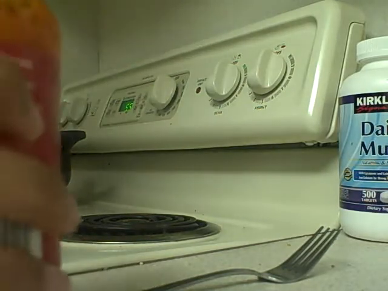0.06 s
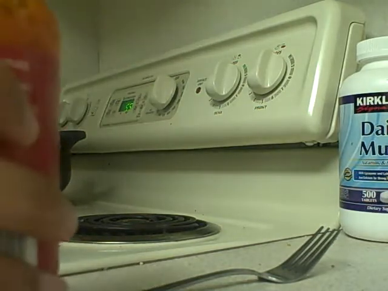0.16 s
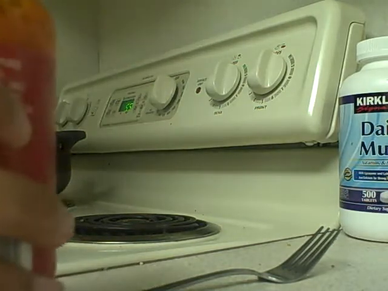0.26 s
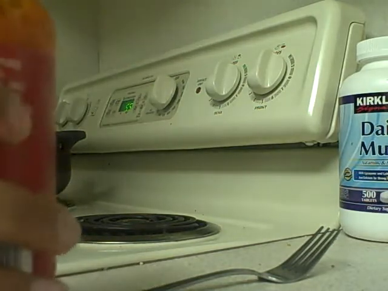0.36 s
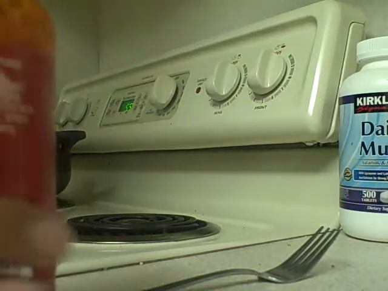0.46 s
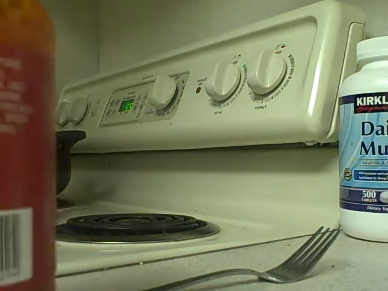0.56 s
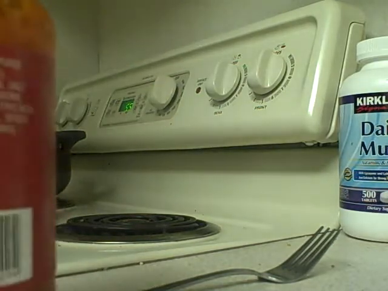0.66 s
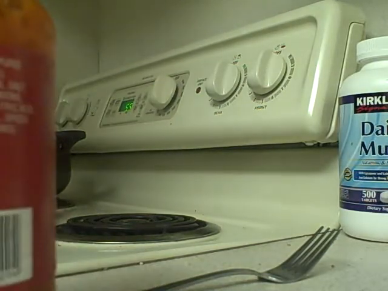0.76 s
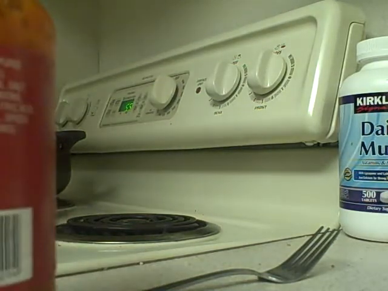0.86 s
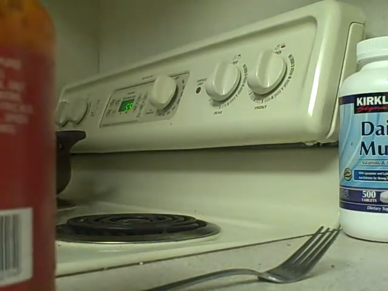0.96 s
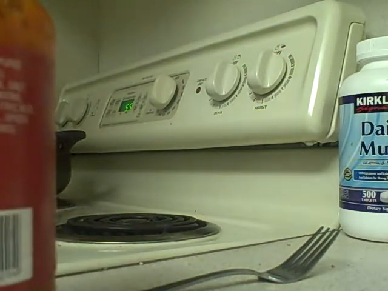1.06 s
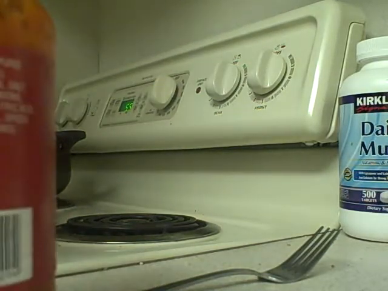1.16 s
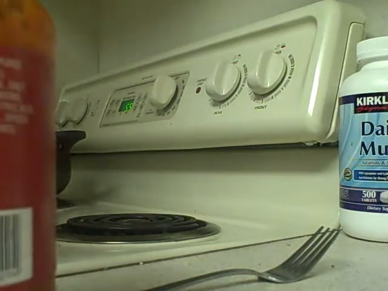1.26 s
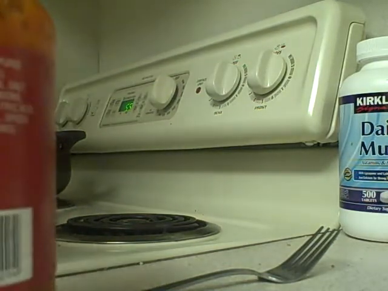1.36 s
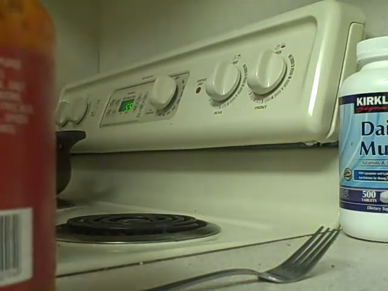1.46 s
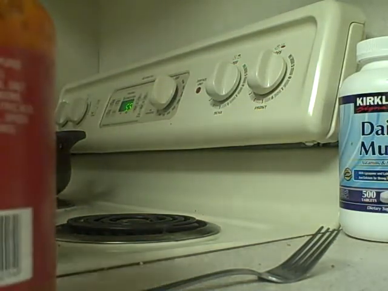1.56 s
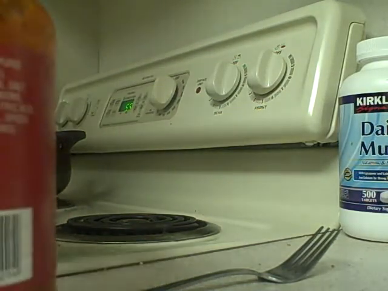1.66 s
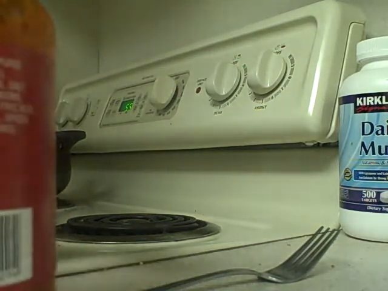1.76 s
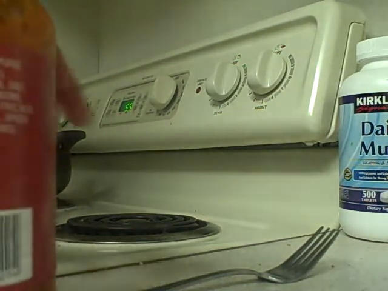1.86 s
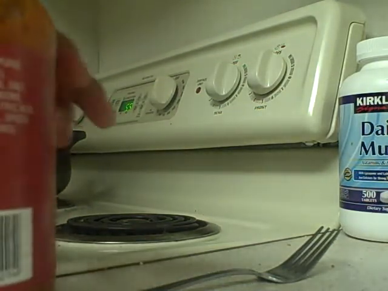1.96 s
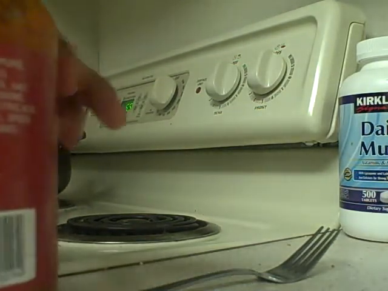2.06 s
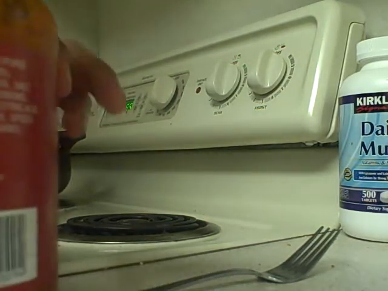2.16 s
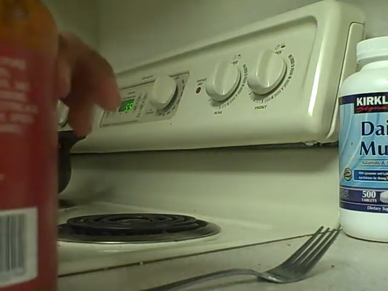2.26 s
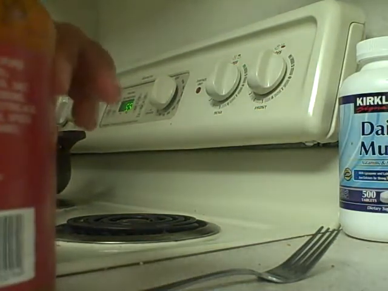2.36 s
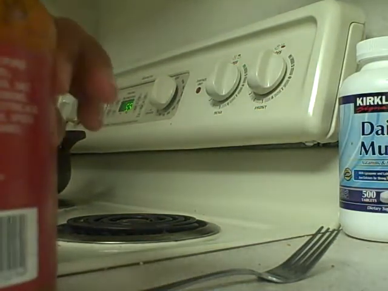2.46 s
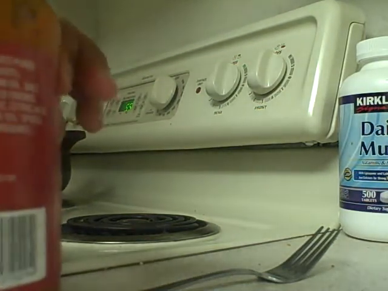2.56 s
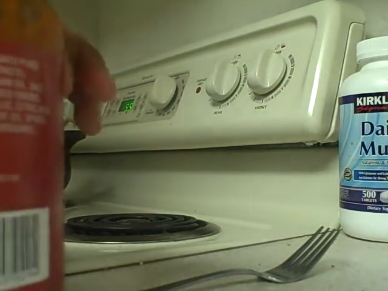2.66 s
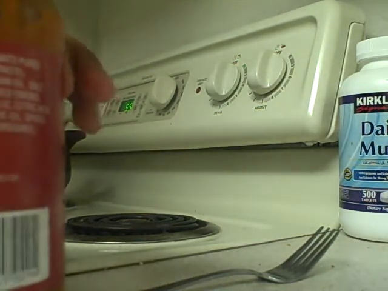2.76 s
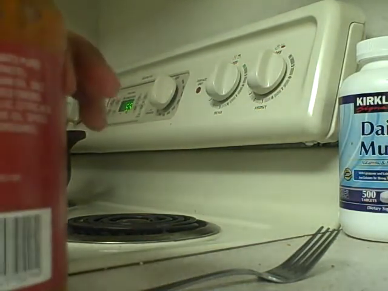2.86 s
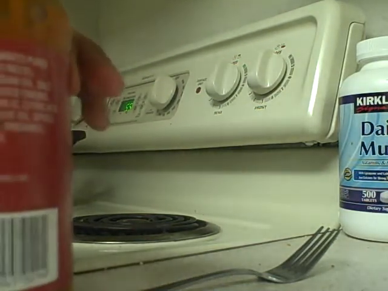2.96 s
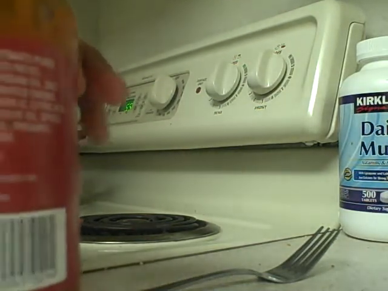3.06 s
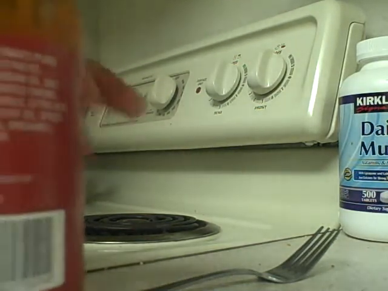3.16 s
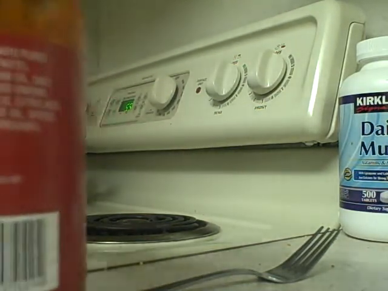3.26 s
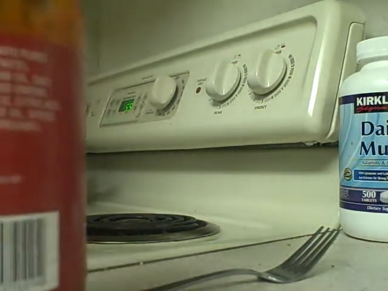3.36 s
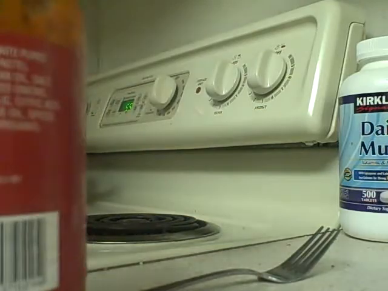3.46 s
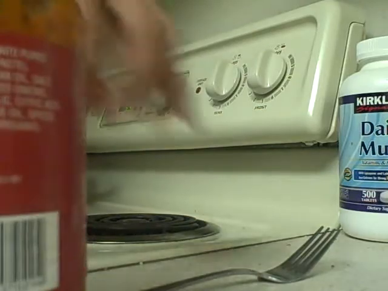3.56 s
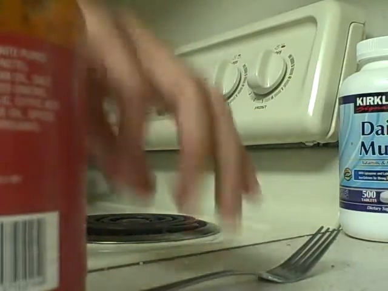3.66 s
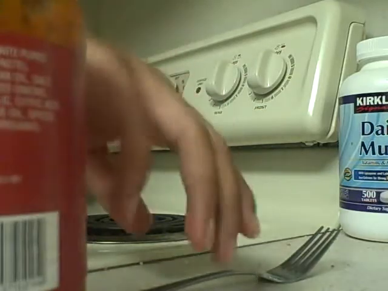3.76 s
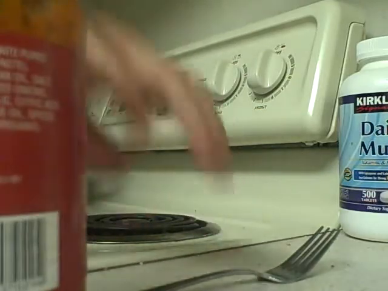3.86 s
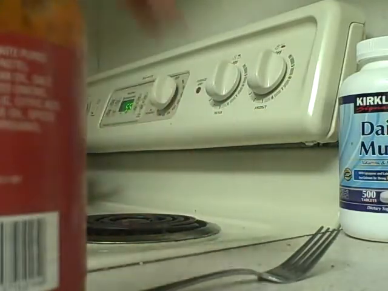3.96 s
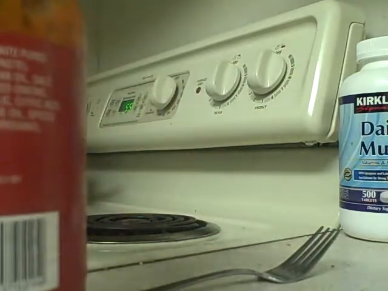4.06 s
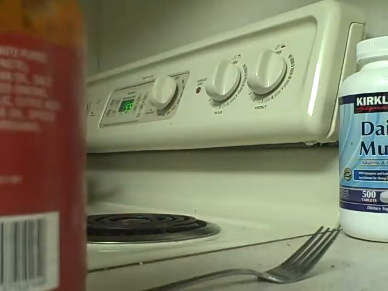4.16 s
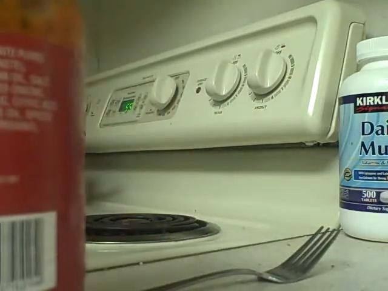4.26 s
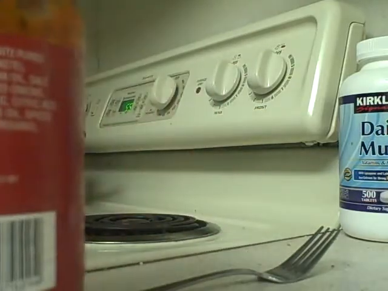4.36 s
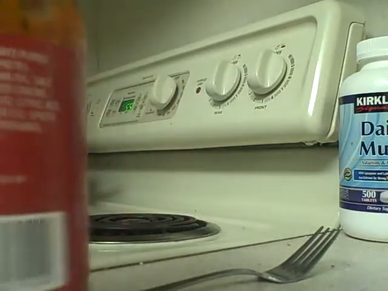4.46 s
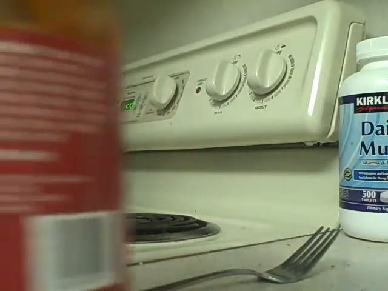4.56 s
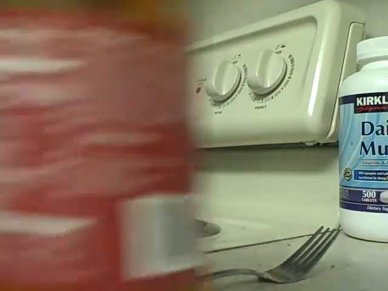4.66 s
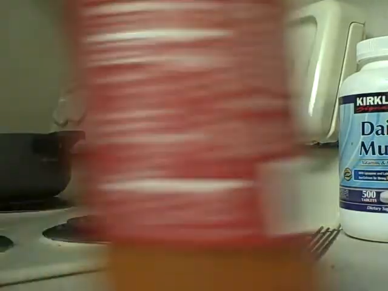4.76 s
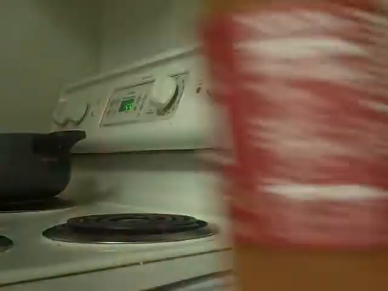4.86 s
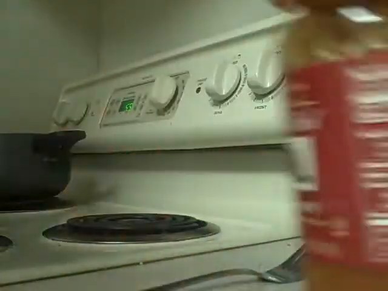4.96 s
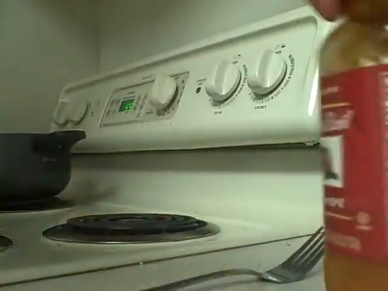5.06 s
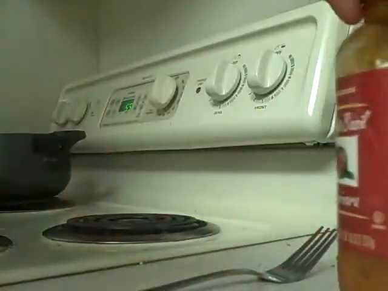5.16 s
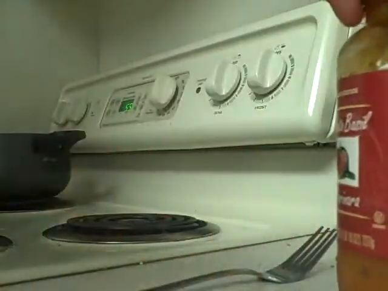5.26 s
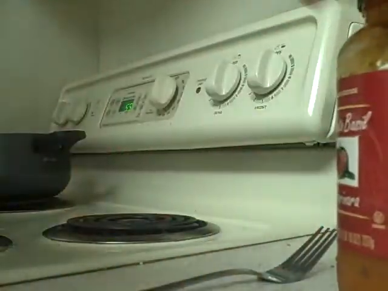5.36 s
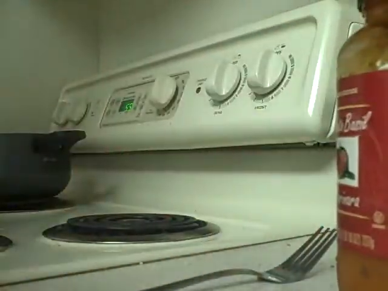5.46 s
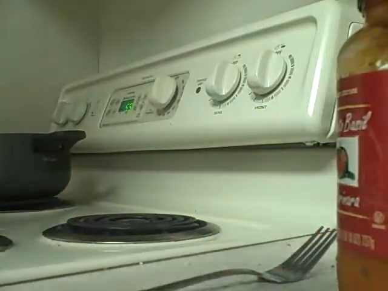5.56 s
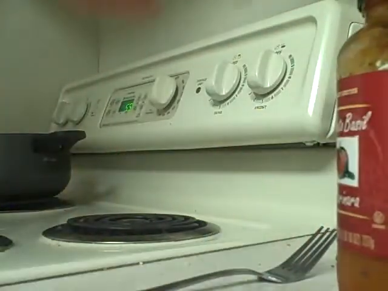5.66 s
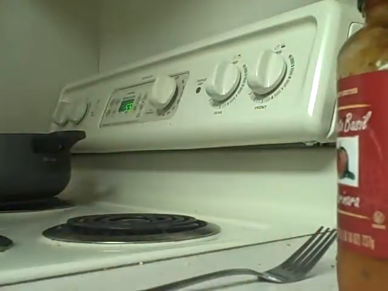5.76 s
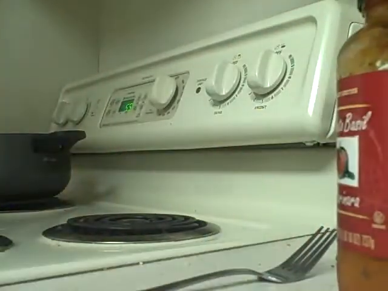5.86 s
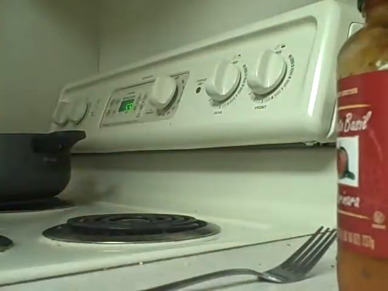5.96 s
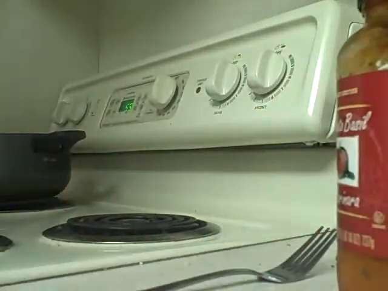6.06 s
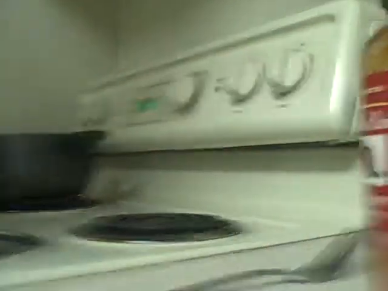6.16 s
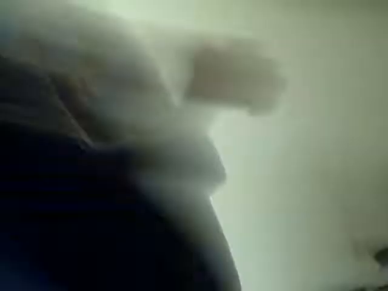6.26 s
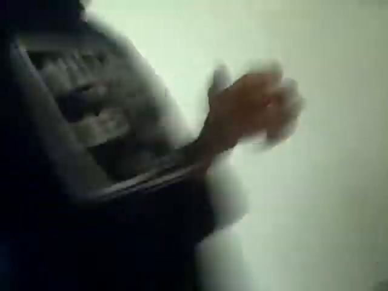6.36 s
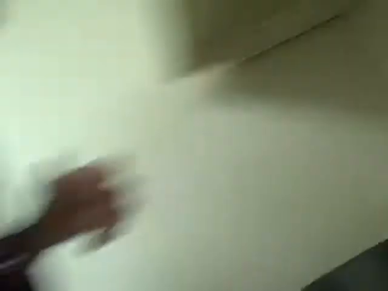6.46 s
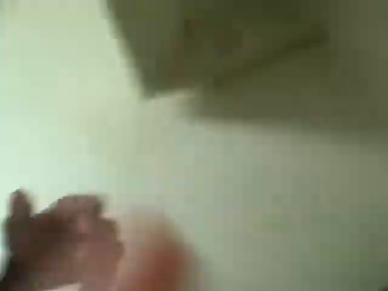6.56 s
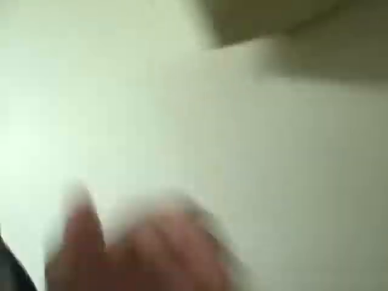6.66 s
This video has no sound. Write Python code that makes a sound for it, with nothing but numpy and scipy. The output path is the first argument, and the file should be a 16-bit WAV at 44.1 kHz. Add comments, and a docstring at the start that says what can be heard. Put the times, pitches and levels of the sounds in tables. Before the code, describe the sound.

A full glass jar knocks and slides on a kitchen counter, a pot clinks, then a hard bang, rattle and handling noise.

```python
"""A full glass sauce jar is set down and nudged on a kitchen counter: knocks with a boom, thud and rebound.
Then it is handled again, knocking, sliding and pinging, while a cooking pot on the stove is clinked.
Near the end it is banged down hard, the stove's sheet metal buzzes, and the jar rocks to rest.
Last, a hand rubs and picks up the camera, which stands on the same counter. A small kitchen answers the
blows, metal, glass and clicks, over steady background noise and a hum that swells now and then."""
import sys
import numpy as np
from scipy import signal
from scipy.fft import rfft, irfft, next_fast_len
from scipy.io import wavfile
from scipy.ndimage import map_coordinates

SR = 44100
rng = np.random.default_rng(int(sys.argv[2]) if len(sys.argv) > 2 else 0)


def unload_audio(sound):
    """Save the sound as a 16-bit wav file, at the path given as the first command line argument."""
    columns = np.transpose(np.atleast_2d(sound))
    # keep every value between -1 and 1, then stretch to whole-number steps
    steps = np.round(np.clip(columns, -1, 1) * 32767)
    wavfile.write(sys.argv[1], SR, steps.astype(np.int16))


N = 295161
T = np.arange(SR) / SR  # seconds since a blow


def amp(db):
    """Decibels to gain."""
    return 10 ** (np.asarray(db) / 20)


def unit(x):
    """Scale to rms 1."""
    return x / np.sqrt(np.mean(x ** 2) + 1e-20)


def along(points, hz):
    """Read (f/Hz, value) points on a log frequency axis."""
    f, value = np.transpose(points)
    return np.interp(np.log(hz + 1), np.log(f + 1), value)


def wobble(rate):
    """A smooth random curve with rate knots a second."""
    knots = rng.standard_normal(int(N * rate / SR) + 4)
    return map_coordinates(knots, [np.arange(N) * rate / SR])


def filtered(x, response):
    """Shape x by a response of frequency."""
    size = next_fast_len(len(x) + SR // 4)
    spectrum = rfft(x, size) * response(np.fft.rfftfreq(size, 1 / SR))
    return irfft(spectrum, size)[:len(x)]


def coloured(x, spectrum):
    """Equalise x with a (f/Hz, level/dB) curve, at rms 1."""
    return unit(filtered(x, lambda hz: amp(along(spectrum, hz))))


def soften(x, hz, order):
    """A causal low-pass: a longer contact holds less treble."""
    low_pass = signal.butter(order, min(hz, SR / 2 - 1), fs=SR, output="sos")
    return signal.sosfilt(low_pass, x)


def add(track, s, sound):
    """Mix a sound into the track at s seconds."""
    part = track[max(round(s * SR), 0):][:len(sound)]
    part += sound[:len(part)]


def swells(rows, rise_s, fall_s):
    """Fade in, hold and die away for each (t, length, dB, ..) row: one gain curve for each dB column."""
    t = np.arange(N) / SR
    gains = np.zeros((len(rows[0]) - 2, N))
    for s, length, *db in rows:
        fade_in = np.clip((t - s) / rise_s, 0, 1)
        fade_out = amp(-20 * np.maximum(t - s - length, 0) / fall_s)  # loses 20 dB in fall_s
        gains = np.maximum(gains, amp(db)[:, None] * fade_in * fade_out)
    return gains


def ring(modes, scatter_db):
    """Damped modes, with new random strengths at every call; neighbours swing in opposite directions."""
    hz, db, t60 = np.transpose(modes)[:, :, None]
    t = T[:SR // 2]
    level = db + scatter_db * rng.standard_normal(db.shape)
    sign = np.cos(np.pi * np.arange(len(hz)))[:, None]
    partials = sign * amp(level - 60 * t / t60) * np.sin(2 * np.pi * hz * t)
    return np.pad(partials.sum(0), (0, SR - len(t)))


def dying_noise(spectrum, decay):
    """Countless modes as noise, each band fading at its own speed; energy 1."""
    hz, t, bands = signal.stft(rng.standard_normal(SR), SR, nperseg=256)
    bands = bands * amp(-60 * t / along(decay, hz)[:, None])
    fading = signal.istft(bands, SR, nperseg=256)[1][:SR]
    return coloured(fading, spectrum) / np.sqrt(SR)


def crack(t60):
    """The burst of noise at a hard contact, fading 60 dB in t60 seconds."""
    return rng.standard_normal(SR) * amp(-60 * T / t60)


def friction(spectrum, rate, smooth, t60):
    """Tiny slips of random size, rate a second, each a short burst of noise, over a smooth rub."""
    slips = (rng.random(N) < rate / SR) * rng.standard_normal(N)
    energy = signal.fftconvolve(slips ** 2, amp(-60 * T / t60) ** 2)[:N]
    bursts = unit(np.sqrt(np.abs(energy)) * rng.standard_normal(N))
    return coloured(bursts + smooth * rng.standard_normal(N), spectrum)


# how long the kitchen rings: (f/Hz, t60/s)
KITCHEN = [(60, 0.49), (400, 0.58), (1000, 0.37), (3000, 0.22), (10000, 0.32)]
# tone of the kitchen's answer: (f/Hz, relative level/dB)
ECHO = [(60, -9.5), (400, -3.5), (1500, -1.5), (5000, -6), (15000, -3.5)]


def in_kitchen(x, wet_db):
    """A sound and the room's answer, which builds up over the first reflections."""
    tail = dying_noise(ECHO, KITCHEN) * (1 - np.exp(-T / 0.0092))
    return x + amp(wet_db) * signal.fftconvolve(x, tail)[:len(x)]


# tone of the kitchen's background noise: (f/Hz, relative level/dB)
AIR = [(12, -25), (20, -10), (68, -2.5), (101, -13), (127, -8), (255, -13.5), (293, -8.5), (446, -15.5),
       (485, -7), (590, -15), (718, -10), (873, -14.5), (1610, -18.5), (1760, -24), (16000, -39)]
AIR_DB = -61  # rms level
# tones of an appliance's hum: (f/Hz, level before the swells/dB)
HUM = [(98, -68), (180, -79.5), (700, -77), (2370, -87)]
# swells of the hum: (t/s, length/s, gain/dB)
HUM_SWELLS = [(0, 0.67, 7), (1.25, 0.67, 7), (5.3, 0.8, 5.5)]
HUM_RISE_S, HUM_FALL_S, HUM_REST_DB = 0.14, 0.38, -10.5  # fade-in; time to lose 20 dB; gain between swells


def background():
    """Room air and microphone hiss as coloured noise, with sines of unsteady level and phase for the hum."""
    t = np.arange(N) / SR
    swell, = swells(HUM_SWELLS, HUM_RISE_S, HUM_FALL_S)
    hum = np.zeros(N)
    for hz, db in HUM:
        hum += amp(db + 2.5 * wobble(4.1)) * np.sin(2 * np.pi * hz * t + wobble(31))
    air = amp(AIR_DB) * coloured(rng.standard_normal(N), AIR)
    return np.maximum(swell, amp(HUM_REST_DB)) * hum + air


# rubs of a hand on the camera's case: (t/s, length/s, rub level/dB, skin hiss level/dB, sway level/dB)
GRIP = [(6.178, 0.023, -38.5, -49.5, -33), (6.247, 0.083, -28, -41, -49), (6.33, 0.064, -31.5, -49.5, -41),
        (6.485, 0.077, -57, -55.5, -51), (6.58, 0.1, -66, -65.5, -51)]
GRIP_RISE_S, GRIP_FALL_S = 0.014, .07  # fade-in; time to lose 20 dB
# tone of the rubbed case: (f/Hz, relative level/dB)
CASE = [(50, -14), (100, -8.5), (180, 3.5), (290, -6), (400, 0.5), (520, -6.5), (640, 0.5), (800, -11),
        (1000, -14.5), (1500, -18), (2500, -38), (6000, -50.5)]
# tone of the skin hiss: (f/Hz, relative level/dB)
SKIN = [(600, -9), (1400, 4), (2300, 2.5), (3500, -2.5), (5500, -11), (9000, -10), (15000, -17)]
# drones of the hollow shell as the grip shifts: (t/s, level/dB, f/Hz)
SHELL = [(6.269, -34, 163.6), (6.317, -23.5, 167.8), (6.356, -23, 197.6)]


def handling():
    """Skin drags over the camera's case, makes its hollow shell drone and sways it."""
    rub_gain, hiss_gain, sway_gain = swells(GRIP, GRIP_RISE_S, GRIP_FALL_S)
    rub = rub_gain * friction(CASE, rate=520, smooth=0.39, t60=0.046)
    hiss = hiss_gain * amp(1.5 * wobble(90)) * friction(SKIN, rate=1900, smooth=0.522, t60=0.0014)
    sway_tone = [(10, -8.0), (30, 0.0), (80, -13.5), (200, -29), (800, -95.0)]  # f/Hz, relative level/dB
    sway = sway_gain * coloured(rng.standard_normal(N), sway_tone)
    drone = np.zeros(N)
    for s, db, hz in SHELL:
        envelope = amp(db - 60 * T / 0.36) * (1 - np.exp(-T / 0.011))
        add(drone, s, envelope * np.sin(2 * np.pi * hz * T))
    return rub + hiss + sway + drone


# clicks of fingers on jar and case: (t/s, level/dB, brightness/dB per octave, relative plastic level/dB)
CLICKS = [(.24, -36.5, -7, -17), (0.423, -39, -1.5, -38), (.442, -48, 9, -24), (.460, -41, 1, -28),
          (3.216, -43.5, 7.5, -34), (3.223, -37, 10.5, -25), (5.188, -38.5, -6.5, -27), (6.2, -24, -3, -21),
          (6.252, -23, -6, -27), (6.273, -19.5, 0, -4), (6.286, -24, -10, -9), (6.4663, -27, -7, -11)]


def clicks():
    """Brief ticks: a tilted noise burst plus the damped modes of knocked plastic."""
    out = np.zeros(N)
    for s, db, bright_db, plastic_db in CLICKS:
        tick = filtered(crack(t60=0.0053), lambda hz: amp(bright_db * np.log2((hz + 800) / 6000)))
        plastic_modes = [(826, 2, 0.03), (1074, 2.4, 0.029), (1424, 4.1, 0.023)]  # f/Hz, level/dB, t60/s
        plastic = ring(plastic_modes, scatter_db=1.0)
        add(out, s, amp(db) * (.5 * tick + amp(plastic_db) * plastic))
    return in_kitchen(out, wet_db=-12.0)


# clear modes of the stove's sheet metal: (f/Hz, relative level/dB, t60/s)
STOVE = [(1272, -1.5, .2), (1525, 2, 0.11), (1794, -1, 0.17), (1770, -4, 0.52), (1930, 13, 0.1),
         (2437, -13.5, 0.17), (2460, -1, 0.17), (2758, 0, 0.26), (3100, -9, 0.15), (3515, -1, 0.13),
         (4970, 0, 0.076), (4640, -32.5, .15), (7010, -16, 0.285)]
# moments when blows shake it: (t/s, level/dB)
SHAKES = [(0.2093, -44.5), (5.0173, -18.5), (5.225, -52)]


def stove():
    """A heavy blow sets the stove's sheet metal buzzing: a few clear modes in a dense rattle."""
    rattle_tone = [(700, -23), (1600, 9.5), (3000, 3.5), (5000, -10.0), (8000, -50.5), (16000, -31.5)]
    rattle_decay = [(1500, 0.083), (5000, 0.037), (12000, 0.085)]  # f/Hz, t60/s
    out = np.zeros(N)
    for s, db in SHAKES:
        rattle = amp(25.0) * dying_noise(rattle_tone, rattle_decay)
        clear = amp(-25) * ring(STOVE, scatter_db=0.0)
        add(out, s, amp(db) * (clear + rattle))
    return in_kitchen(out, wet_db=-12.5)


# clinks on the pot: (t/s, level/dB, focus f/Hz, boost there/dB, tilt/dB per octave,
# relative crack level/dB, ring length/share of t60)
CLINKS = [(2.0575, -22.5, 2230, 2.5, 3.5, -9.5, 0.94), (2.1016, -26.5, 3330, 26, -13.5, -1, 1.2),
          (2.1682, -30.5, 9900, -6, 0, 13, 0.42), (2.1787, -29, 4660, 14.5, -6, 10, 1.3),
          (2.335, -45, 2280, -8.5, -6, 2, 1.2), (2.515, -53.5, 3200, 10, -1, 3, 0.6),
          (2.575, -46.5, 2980, 24, 3.5, 17, 0.55), (3.470, -63, 3180, 18, -1, -15, 0.27),
          (4.217, -65, 2970, 22, -1, 5, 0.96), (4.401, -54, 2920, 27.5, 1, 13, 0.3)]
# clear modes of the pot: (f/Hz, relative level/dB, t60/s)
POT = [(1282, -34, .35), (1345, -27, .12), (1700, -15, .045), (2230, 11, .016), (2300, -24, .4),
       (2365, 4, .024), (2620, -24, .17), (2966, -25, .17), (3165, -11, .06), (3544, -30, .18),
       (3695, -29, .16), (4445, -32, .26), (4590, -20, .06), (4870, -31, .25), (4925, -32, .42),
       (4968, -9, .05), (5120, -25, .22), (6540, -12, .02), (7040, -27, .06), (8180, -23, .05),
       (8405, -17, .05), (8928, -20, .05), (9356, -15, .065), (9535, -22, .07), (10975, -19, .045)]
# tone of its dense weak modes: (f/Hz, relative level/dB)
WALL = [(1200, -4.5), (2200, 5), (3000, -7.5), (3900, -5), (4900, -6), (5600, -26), (6500, -4), (7500, -39),
        (9400, -14), (12000, -19), (16000, -8)]


def clinks():
    """Each contact point favours other modes of the pot; a lingering touch damps them."""
    out = np.zeros(N)
    hz, level, t60 = np.transpose(POT)
    wall_decay = [(2000, 0.044), (6000, 0.04), (14000, 0.028)]  # f/Hz, t60/s
    thin_wall = signal.butter(3, 1350, "high", fs=SR, output="sos")  # a thin wall radiates little bass
    for s, db, focus_hz, boost_db, tilt_db, crack_db, length in CLINKS:
        focus = boost_db * np.exp(-(np.log2(hz / focus_hz) / 0.13) ** 2)
        tilt = tilt_db * np.log2(hz / 2500)
        metal = ring(np.transpose([hz, level + focus + tilt, t60 * length]), scatter_db=1.2)
        shimmer = amp(18.5) * dying_noise(WALL, wall_decay)
        snap = amp(crack_db - 3.0) * soften(crack(t60=0.013), hz=9060, order=1)
        clink = (1.015 * metal + shimmer + snap) * (1 - np.exp(-T / 0.00098))
        radiated = signal.sosfilt(thin_wall, clink)
        add(out, s, in_kitchen(amp(db) * radiated, wet_db=-12.5))
    return out


# light taps on the jar: (t/s, level/dB)
PINGS = [(2.43, -44.5), (2.656, -51), (2.742, -49.5), (2.906, -54), (3.024, -54), (3.303, -57),
         (4.266, -42), (4.591, -61), (4.939, -48)]
# modes of the jar's wall, damped by the sauce: (f/Hz, relative level/dB, t60/s)
GLASS = [(1785, -3, .16), (1835, -7, .13), (1740, -9, .1), (2740, -15, .07)]


def pings():
    """A light tap draws a short note from the jar, beating between close modes."""
    out = np.zeros(N)
    for s, db in PINGS:
        note = ring(GLASS, scatter_db=1.5)
        add(out, s, amp(db) * note * (1 - np.exp(-T / 0.0035)))
    return in_kitchen(out, wet_db=-8.5)


# pushes that slide or roll the jar on its base: (t/s, length/s, rumble level/dB, grit level/dB)
SLIDE = [(0, 0.03, -22.5, -45), (.05, 0.073, -32, -53), (.265, 0.072, -48, -58), (.33, 0.033, -55.5, -47.5),
         (.515, 0.034, -54.5, -64.5), (.665, 0.034, -50, -49), (2.405, 0.048, -50, -55),
         (2.5, 0.058, -45.5, -51), (2.565, 0.062, -46.5, -49.5), (2.645, 0.13, -51.5, -59),
         (2.73, 0.041, -40.5, -52.5), (2.85, 0.12, -54, -63), (2.96, 0.061, -46, -56),
         (3.09, 0.062, -45.5, -53), (3.17, .115, -37, -54.5), (4.515, 0.072, -37, -50),
         (5.018, 0.078, -21.5, -45), (5.08, .11, -27, -47.5), (5.195, 0.026, -15, -52.5)]
SLIDE_RISE_S, SLIDE_FALL_S = 0.017, 0.065  # fade-in; time to lose 20 dB
# tone of the rumble: (f/Hz, relative level/dB)
ROLL = [(25, -23), (60, 3), (120, 2), (185, 9.5), (270, 0.5), (420, 4.5), (560, -1), (650, -9), (780, -9),
        (1050, -15.5), (1400, -23.5), (3000, -41), (8000, -64.5)]
# tone of the grit: (f/Hz, relative level/dB)
GRIT = [(350, -14.5), (800, 13), (1200, 3.5), (1800, -4.5), (2800, -8.5), (4500, -20.5), (8000, -26.5),
        (16000, -27.5)]


def slide():
    """The jar's base chatters over the counter and grinds on crumbs, which makes its glass sing faintly."""
    rumble_gain, grit_gain = swells(SLIDE, SLIDE_RISE_S, SLIDE_FALL_S)
    rumble = rumble_gain * amp(1.2 * wobble(37)) * friction(ROLL, rate=650, smooth=0.12, t60=0.022)
    grit = grit_gain * amp(1.2 * wobble(47)) * friction(GRIT, rate=1100, smooth=0.66, t60=0.0066)
    singing = amp(-44) * signal.fftconvolve(grit, ring(GLASS, scatter_db=7.0))[:N]
    return in_kitchen(rumble + grit + singing, wet_db=-11.5)


# clear modes of counter and stove top: (f/Hz, relative level/dB, t60/s)
COUNTER = [(60, -20.5, 0.41), (81.5, -25.5, .2), (138, -13, 0.27), (182, -16.5, .28), (206, -17, 0.3),
           (256, -21, .22), (284, -21, 0.044), (362.8, -12.5, 0.15), (419.6, -11.5, 0.19),
           (515.7, 0, 0.062), (563.3, -15, 0.04), (669, -16.5, 0.027), (745, -15, 0.18), (918, -13, 0.02),
           (1145, -5, 0.02), (1737, -20, .06)]
# tone of their dense upper modes: (f/Hz, relative level/dB)
PANELS = [(30, -23.5), (60, -3), (200, -3), (500, 3.5), (1050, 5.5), (1350, -5), (2200, -5.5), (5000, 1.5),
          (16000, -4)]
# how long the dense modes last: (f/Hz, t60/s)
PANEL_DECAY = [(100, 0.32), (500, 0.15), (1500, 0.068), (8000, 0.024)]


def blow(contact_hz, thud_hz, thud_db, tick_db):
    """A blow pushes and rings the counter; the jar's thud has a pitch that depends on where it lands."""
    cycles = 0.6 * contact_hz * T
    push = amp(-1 - 7.0 * cycles) * np.sin(2 * np.pi * cycles)  # loses 7 dB a cycle
    body = amp(-6.5) * ring(COUNTER, scatter_db=3.5) + amp(21.0) * dying_noise(PANELS, PANEL_DECAY)
    boom = soften(body, contact_hz, order=3)
    thud_envelope = amp(thud_db - 2 - 60 * T / 0.094) * (1 - np.exp(-T / 0.0011))
    thud = thud_envelope * np.sin(2 * np.pi * thud_hz * T)
    tick = amp(tick_db) * soften(crack(t60=0.013), hz=2800, order=1)
    return in_kitchen(push + boom + thud + tick, wet_db=-15.5)


# banged down, the jar rocks on its rim, ever faster and weaker
ROCK_START_S, ROCK_GAP_S, ROCK_SHRINK = 5.079, .067, 0.62  # first contact, first gap, each gap over the last
ROCK_DB, ROCK_LOSS_DB, ROCK_COUNT = -20, 1, 6  # first contact, loss a contact, contacts


def rocking():
    """The jar rocks to rest: dull blows at shrinking gaps."""
    out, s = np.zeros(N), ROCK_START_S
    for k in range(ROCK_COUNT):
        contact = blow(contact_hz=760, thud_hz=541, thud_db=0, tick_db=-34.5)
        add(out, s, amp(ROCK_DB - ROCK_LOSS_DB * k) * contact)
        s += ROCK_GAP_S * ROCK_SHRINK ** k
    return out


# blows on the counter: (t/s, level/dB, contact cut-off f/Hz, thud f/Hz, relative thud level/dB, # relative tick
# level/dB, rebound delay/s, rebound level relative to the blow/dB); the row at 2.059 s is the pot's dull body
# thud under its first clink
KNOCKS = [(.001, -17, 1194, 393, 2, -16.5, 0.024, -11.5), (0.1976, -9, 1175, 406, 4.5, -24.5, .0074, -7.5),
          (2.059, -45.5, 397, 358, 23.5, -53, .011, -33), (2.103, -23.5, 466, 306, 2.5, -9, 0.018, -40),
          (2.168, -27.5, 510, 280, -4, -28, .01, -22), (2.188, -20, 660, 315, -12, -13, .01, -7.5),
          (2.364, -31.5, 870, 349, -2, -28, 0.014, -35), (2.4278, -34.5, 463, 200, 1, -9, .01, -7),
          (2.575, -34.5, 1200, 700, -7, -15, 0.016, -18), (2.75, -32.5, 1050, 367, 1, -16, 0.012, -23),
          (2.938, -34, 780, 435, -12, -26, 0.027, -25), (3.2224, -29, 920, 410, 1.5, -12.5, .0225, -4),
          (3.28, -38.5, 650, 427, 13, -30, .012, -22), (3.389, -41.5, 786, 186, 8, -23, 0.0093, -9.5),
          (4.198, -40, 150, 66.4, 7, -45, 0.0146, -5.5), (4.2519, -23, 955, 373.4, 4, -18, 0.013, -2.5),
          (4.406, -24.5, 853, 379.3, 2.5, -23, .012, -.5), (4.541, -18, 710, 369, -5, -32, 0.027, -12.5),
          (4.566, -26, 870, 481, 4, -32, 0.012, 3), (4.6338, -24.5, 1130, 426, -19, -23, 0.0087, -26.5),
          (5.0179, 2.5, 1076, 561, -10.5, -10, 0.026, -19.5), (5.225, -19, 830, 556, 1, -37, 0.029, -3)]


def knocks():
    """Each knock is a blow and its quick rebound, as the far edge of the base lands; one row gives the pot's
    first clink its dull thud."""
    out = np.zeros(N)
    for s, db, contact_hz, thud_hz, thud_db, tick_db, rebound_s, rebound_db in KNOCKS:
        add(out, s, amp(db) * blow(contact_hz, thud_hz, thud_db, tick_db))
        add(out, s + rebound_s, amp(db + rebound_db) * blow(contact_hz, thud_hz, thud_db, tick_db))
    return out


def scene():
    """Everything on and around the counter, from the background to the knocks."""
    surroundings = background() + handling() + clicks() + stove() + clinks()
    jar = pings() + slide() + rocking() + knocks()
    return (surroundings + jar)[None]


TOP_HZ = 16200  # the camera's band limit


def record(dry):
    """The microphone overloads, flattening the loudest peaks; the camera keeps nothing above its band limit."""
    clipped = np.clip(dry[0], -.71, .71)
    return filtered(clipped, lambda hz: hz < TOP_HZ)[None]


dry = scene()
out = record(dry)
unload_audio(out)
```